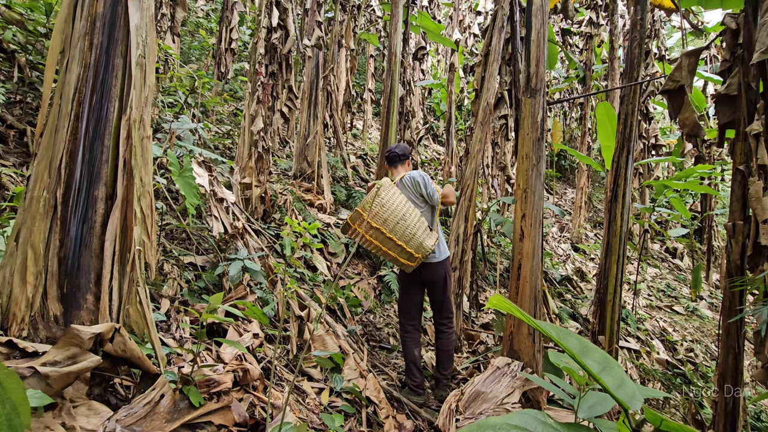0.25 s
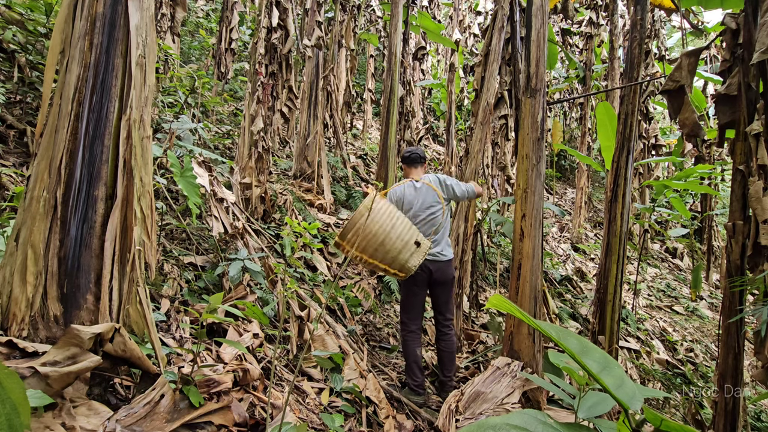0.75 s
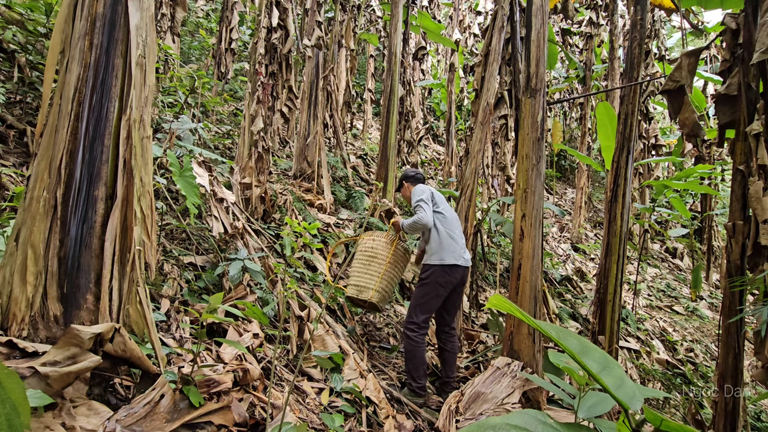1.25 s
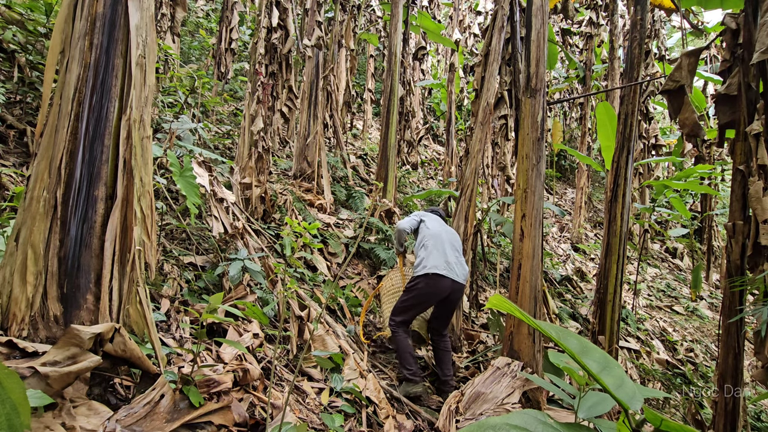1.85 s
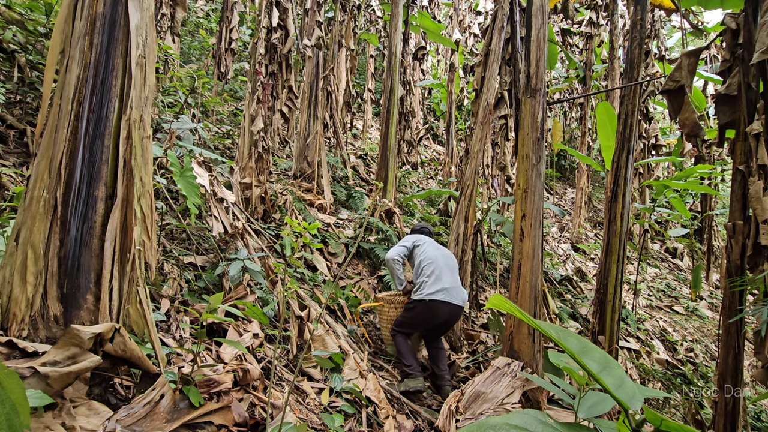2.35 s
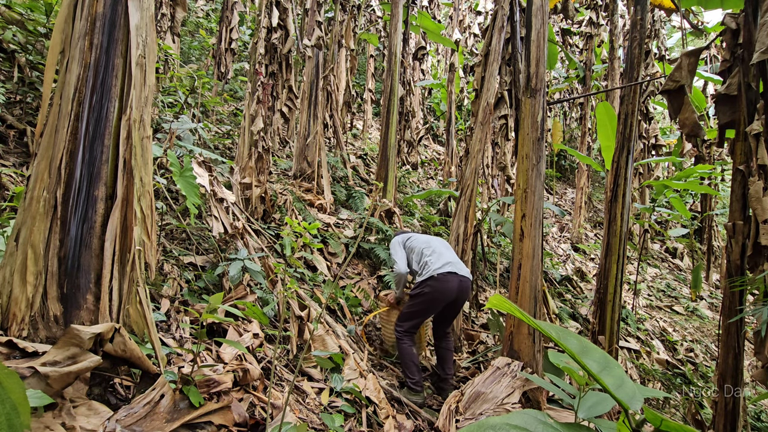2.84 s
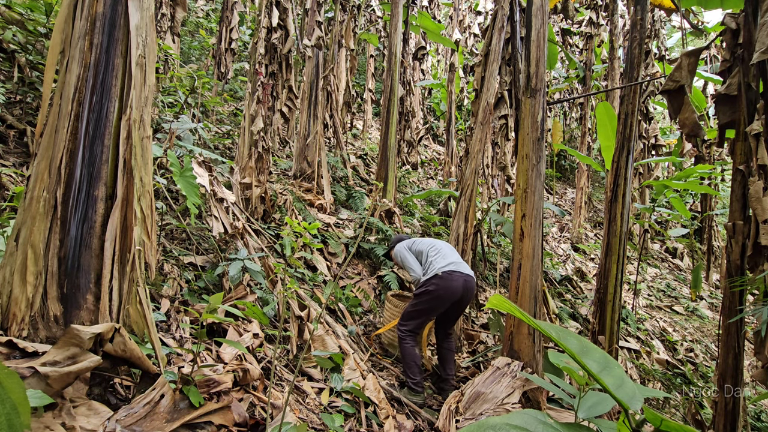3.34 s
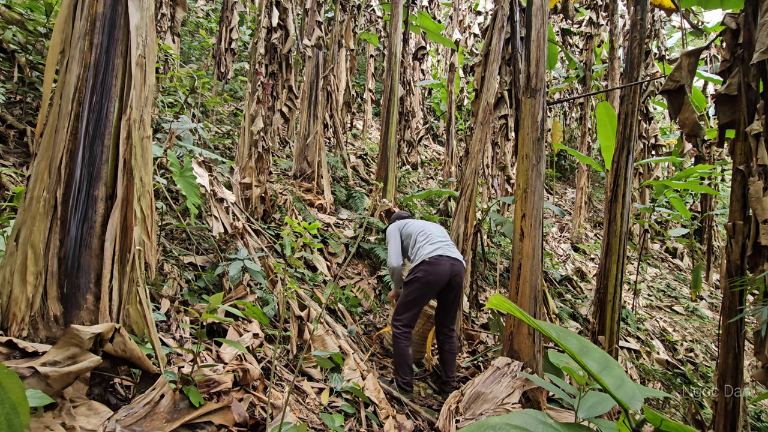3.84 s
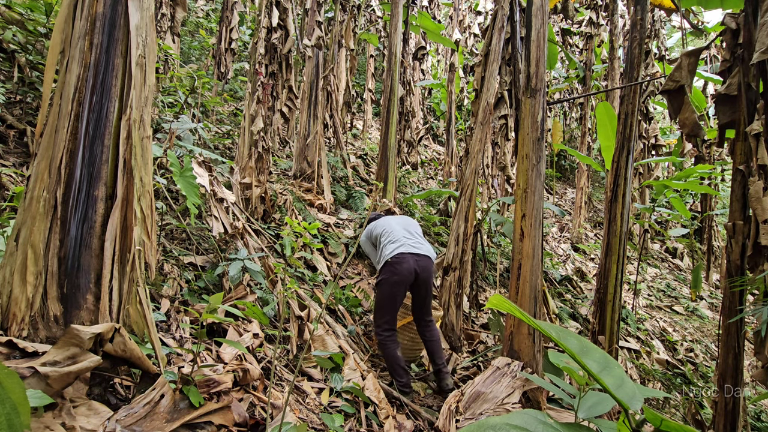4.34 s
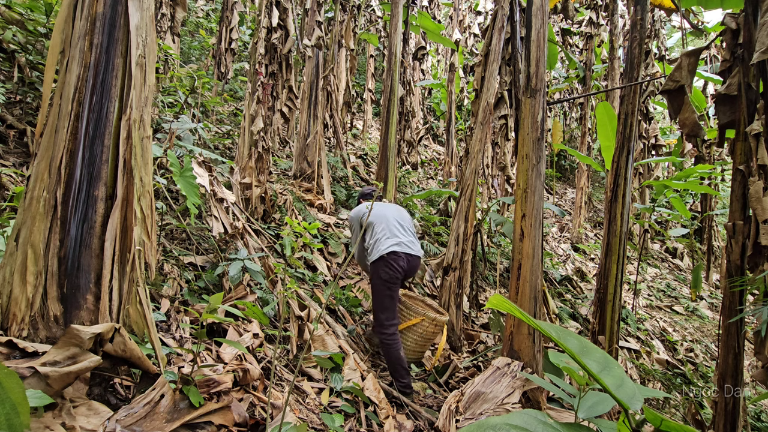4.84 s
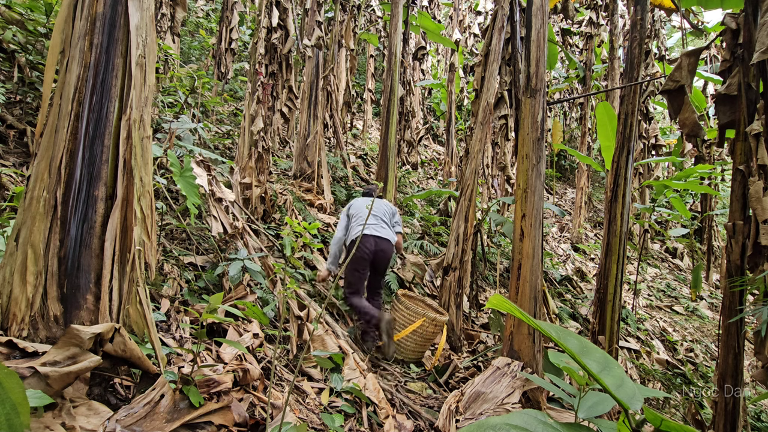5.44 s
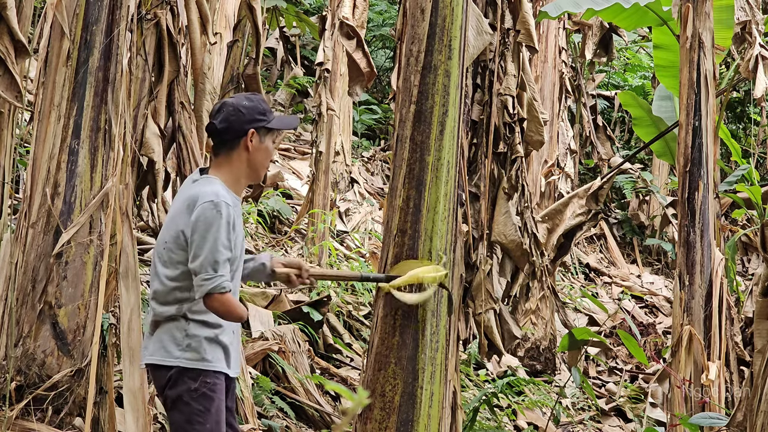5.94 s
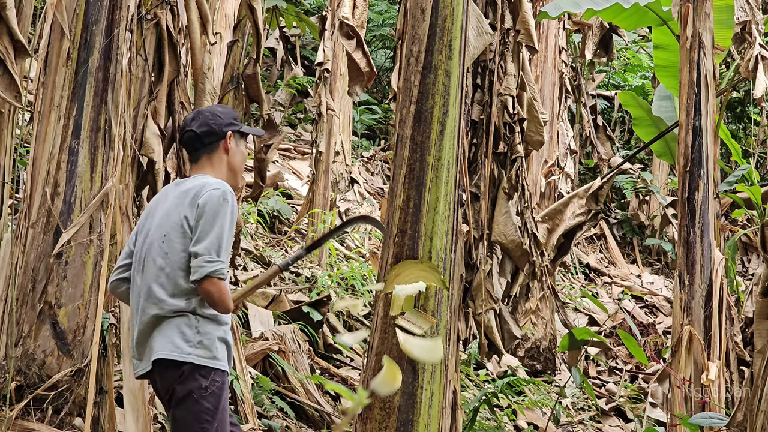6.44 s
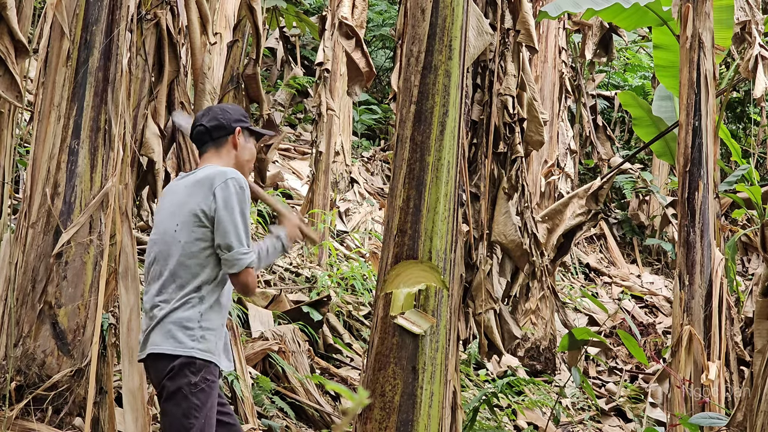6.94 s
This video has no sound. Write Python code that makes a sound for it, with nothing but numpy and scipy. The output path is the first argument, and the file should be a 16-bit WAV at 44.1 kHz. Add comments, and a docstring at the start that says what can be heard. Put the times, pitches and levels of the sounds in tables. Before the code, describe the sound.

A quiet grove with soft air and faint high insect hiss. A tiny bird chirp comes at about 0.1 s over light leaf movement. At 0.5 s a step crunches with sharp little snaps; sparse crackles follow, with a woody knock at 1.3 s. Wicker gives a short gliding squeak at 1.5 s, then soil thuds and a ringing scrape at 1.8 s. Another step thuds near 2.4 s. A very sharp, bright snap cracks at 3.06 s, followed by a low wicker creak. Leaves rustle in tugs from 3.8 to 4.9 s with many stalk snaps, swelling to dense bright crackling at 5.1-5.6 s and low thuds near 5.7 s. From 6.0 s a juicy stem tears with hollow, fibrous cracks, strongest around 6.2 s; the blade slides out at 6.35 s. Chips drop with knocks, soft thuds and leaf rustle until 7.1 s. Short scattered echo, stereo, handling slightly left.

```python
"""Cutting a stem in a banana grove

Someone steps over dry leaves, sets a wicker basket down and drags it: tiny noisy breaks crackle,
stalks and wicker snap in short bursts, soil thuds softly, and rubbed wicker squeaks, scrapes and creaks.
Later, and louder, a blade is levered in a juicy stem: fibres tear and chips drop on the litter.
Insects hiss as narrow noise, a small bird chirps once as a gliding tone, and trunks scatter a short echo."""
import sys
import numpy as np
from scipy import signal
from scipy.fft import rfft, irfft, next_fast_len
from scipy.io import wavfile
from scipy.ndimage import uniform_filter1d, map_coordinates

SR = 44100
rng = np.random.default_rng(int(sys.argv[2]) if len(sys.argv) > 2 else 0)


def unload_wav(signal):
    """Save mono or channel-first audio to the path in sys.argv[1] as 16-bit WAV at rate SR, clipped to [-1, 1]."""
    wavfile.write(
        sys.argv[1],
        SR,
        np.round(np.clip(np.atleast_2d(signal).T, -1, 1) * 32767).astype(np.int16),
    )


N = 316638  # length in samples

# each step, drag or tug in the litter: peak_s, swell_s, fade_s, crackle_db,
# then relative to the crackle: sheen_db, crunch_db, rumble_db
LITTER_STIRS = [(0.185, 0.37, 0.073, -67.5, -2, -12, 2), (0.531, 0.14, 0.14, -51.5, -1, -6, -12),
                (0.72, 0.14, 0.19, -62.5, -0.5, -15, -18), (0.95, 0.17, .22, -64.5, 2, -5, -3),
                (1.18, .02, 0.12, -64, -7, -20, -10), (1.325, 0.025, 0.089, -58.5, -4, 2, -7),
                (1.484, 0.013, 0.062, -54, 3, -30, -30), (1.64, 0.1, 0.39, -66.5, -2, -11, -19),
                (1.78, .025, 0.18, -63, -5, -2, 10.5), (1.916, 0.12, 0.085, -53, -1.5, 0.5, 0),
                (2.09, 0.11, 0.28, -60, -1.5, -8.5, -10), (2.24, 0.25, 0.15, -59.5, 0.5, -3.5, -9),
                (2.461, 0.082, 0.15, -52, -3.5, -4.5, 0.5), (2.794, 0.015, .16, -60.5, 5.5, -24, -8),
                (2.87, .03, 0.16, -59.5, -2, -20, -6), (2.993, .1, 0.44, -54, -2, -5, -20),
                (3.073, 0.033, 0.22, -50, -2, -3, -8), (3.26, 0.3, 0.16, -54.5, -1, -11.5, -7),
                (3.6, 0.26, 0.39, -67, -2, -9, -20), (3.79, 0.16, 0.16, -56, 0, -9, -22),
                (3.93, 0.19, 0.12, -52.5, -0.5, -5.5, -20), (4, 0.15, 0.22, -48, -0.5, 1, -13),
                (4.15, 0.16, 0.41, -55, 0, -1.5, -4), (4.415, 0.13, 0.25, -58.5, -1, -2.5, -20),
                (4.51, 0.24, 0.13, -57, 1.5, -7, -10), (4.63, 0.09, 0.1, -57, 1, -13, -15),
                (4.8, .06, .09, -75, -7, -23, -14), (4.93, 0.085, 0.35, -53, 1, -8.5, -21),
                (5.083, 0.11, 0.08, -45.5, 0, -7, -11), (5.172, 0.12, 0.16, -44, 0, -2, -6),
                (5.28, 0.11, 0.095, -46.5, 0.5, -4, -11), (5.37, 0.11, 0.079, -41, 2.5, -12, -7.5),
                (5.434, 0.058, .1, -46, 3, -6, -0.5), (5.541, 0.13, 0.17, -43.5, 0, -6.5, -6.5),
                (5.68, 0.082, 0.12, -48, -0.5, 0.5, 4), (5.88, 0.066, 0.094, -55, -2, 0.5, -3.5),
                (6.003, 0.045, 0.19, -57.5, -11, 5, -12), (6.082, 0.086, 0.39, -46, -4, 0, -12.5),
                (6.215, 0.1, 0.14, -44, 1, -1, -14), (6.4, 0.12, 0.25, -60, -8, -1, -33),
                (6.501, 0.24, 0.14, -52, -0.5, -1.5, -6), (6.635, 0.039, 0.37, -55, 0, -4.5, -7),
                (6.75, 0.18, 0.17, -53, -3, -5, -3), (6.849, 0.18, 0.19, -49, 1, -8, -20),
                (6.975, 0.086, .04, -60.5, -6, 6.5, 4), (7.061, 0.017, 0.27, -50.5, 0, -13, -7)]
# the litter between stirs: crackle_db, then relative to it: sheen_db, crunch_db, rumble_db
LITTER_REST = (-74.5, -1.5, 2.5, 3)
# how steeply stirs swell and fade, as a power for: crackle, sheen, crunch, rumble
RAMP_POWERS = (1.4, 1.5, 1.6, 2.4)
# colours of the four litter layers: pitch_hz, level_db
CRACKLE_COLOUR = [(900, -11), (1600, -8), (2600, -2.5), (4100, 0), (6500, -2.5), (8000, -4.5), (9500, -66)]
SHEEN_COLOUR = [(6000, -21), (8000, -8.5), (10000, -9.5), (11600, -5.5), (13500, -13), (15400, -11.5)]
CRUNCH_COLOUR = [(180, -44), (320, -2.5), (700, -1), (1300, -3), (2200, -5), (3500, -24)]
RUMBLE_COLOUR = [(20, -45), (45, -36), (75, 3), (110, -4.5), (220, -1), (330, -10.5), (500, -19)]
# colour of the steady air: pitch_hz, level_db
AIR_COLOUR = [(18, -8), (30, 4), (86, 3.5), (149, -4.5), (279, 3), (372, -17), (680, -10), (1090, -19),
              (1340, -20), (1890, -46), (2520, -11), (4150, -6), (5680, -14), (7390, -13), (15800, -68)]
# how alike left and right are: pitch_hz, likeness (1 same, 0 unrelated)
LEFT_RIGHT_LIKENESS = [(60, .98), (250, .94), (640, .8), (1400, .62), (3100, .2), (7000, .05), (15000, -.1)]
# band of the insect hiss: pitch_hz, width_hz, level_db
INSECT_BAND = [(6400, 400, 0)]
# path of the bird's chirp: time_s, pitch_hz, level_db
BIRD_CHIRP = [(0.025, 6870, -82), (0.057, 6957, -64), (0.115, 6500, -75)]
# snaps of stalks, wicker and fibre: start_s, level_db,
# then relative to that level: knock_db, sheen_db; last the piece's own pitch_hz
SNAP_EVENTS = [(0.125, -59, -4.5, -1, 4120), (0.164, -52.5, -12, -5, 4370), (0.2015, -58.5, -6, -2, 3740),
               (0.5033, -44, -19, -1, 3230), (0.5345, -45, -6, 1, 3900), (0.5509, -43, -5, -15, 3950),
               (0.705, -49, -9.5, 5.5, 2080), (0.7394, -50.5, -26, -4, 3660), (0.8035, -52, -16, -13, 4700),
               (0.8163, -52.5, -1.5, 8, 1590), (1.004, -55, -24, -6, 2750), (1.1741, -45, -34, -19, 3100),
               (1.2754, -52.5, -12, 9, 4570), (1.3194, -40, 7.5, -27, 1180), (1.401, -64, -6, -18, 1190),
               (1.4731, -56, -29, 9, 1280), (1.6316, -39.5, -8, 0, 4500), (1.75, -47, -12.5, -3, 2300),
               (1.8842, -43, -19, -2, 2540), (2.4024, -52, -4, -14, 2000), (2.4389, -51, 2, -1, 1990),
               (2.7926, -63, -18, 19, 2030), (2.8585, -51.5, -14, 5, 5430), (3.0628, -24.5, -28, 9.5, 1580),
               (3.468, -58.5, -20, 3, 5500), (3.5448, -58, -23, 0, 4220), (3.5905, -58, -8, 11, 3680),
               (3.6787, -54.5, -6, 5.5, 3700), (3.7696, -47, -5, 4.5, 1920), (3.8736, -45, -24, -20, 4230),
               (3.9987, -38, 1, -10, 1940), (4.1583, -43, -23, -7, 3580), (4.2885, -49.5, -18, -16, 3740),
               (4.3578, -42.5, -17, -4, 2270), (4.4068, -38.5, -1, 6, 5700),
               (4.458, -38.5, -1.5, -14, 1730), (4.5506, -39.5, -32, -3, 2280), (4.57, -43.5, -10, 4, 4700),
               (4.6252, -46.5, -14.5, 6.5, 3340), (4.7826, -55, -33, 8.5, 3380),
               (4.7972, -52, -36, -9, 4210), (4.8432, -56, -22, 10.5, 4240), (4.9058, -52, -11, 8, 4520),
               (4.9811, -44.5, -3, -16, 1020), (5.1028, -33.5, -32, -2, 6060),
               (5.4301, -36.5, -24, -8, 3740), (5.514, -39, -1, -15, 1950), (5.6524, -41.5, 6, -5, 1330),
               (5.8682, -46.5, -12, -16, 1270), (5.9944, -53, 12, -26, 1330),
               (6.0629, -40.5, -2, -23, 1710), (6.186, -33, -3.5, -20, 1090), (6.2395, -34.5, -4, -5, 1090),
               (6.3287, -49.5, 5, -22, 2220), (6.3556, -46.5, 0, -14, 2500), (6.4869, -46.5, 7, -16, 1610),
               (6.622, -47, -24, 0, 2400), (6.718, -40.5, -9, -17, 1000), (6.756, -40.5, -3, -16, 2170),
               (6.8858, -43.5, 0, -23, 2590), (7.0569, -41, -6.5, -3, 3460)]
# soft blows on the soil: start_s, level_db, pitch_hz
SOIL_THUDS = [(0.539, -49, 299), (1.321, -47, 254), (1.767, -39.5, 108), (1.798, -45.5, 205),
              (1.836, -46, 260), (1.855, -41, 199), (2.432, -40.5, 250), (2.451, -45, 69.6),
              (2.468, -48, 133), (3.999, -43, 104), (4.46, -38.5, 218), (5.307, -41.5, 200),
              (5.458, -43, 238), (5.655, -35.5, 155), (5.674, -33, 122), (5.708, -34, 85),
              (6.484, -41.5, 220), (6.509, -46, 233), (6.701, -45, 229), (6.748, -40, 192),
              (6.88, -46, 230), (6.962, -47.5, 237), (7.058, -44.5, 130)]
# a squeaking wicker strand: time_s, pitch_hz, level_db
WICKER_SQUEAK = [(1.482, 1097, -74), (1.49, 1165, -50.5), (1.497, 1254, -47.5), (1.504, 1334, -53),
                 (1.512, 1350, -83), (1.53, 1300, -60), (1.545, 1210, -64)]
# the basket scraping over the litter: time_s, level_db
SCRAPE_STROKE = [(1.765, -57), (1.785, -52), (1.82, -54), (1.855, -52), (1.885, -60)]
# its ringing wicker: pitch_hz, width_hz, level_db
SCRAPE_RING = [(2100, 72, 7.5), (2700, 80, -1), (3440, 200, -1.5), (4900, 110, -7), (6450, 250, -19),
               (7300, 193, -10)]
# the wicker creaking as it settles: time_s, level_db
CREAK_STROKE = [(3.175, -57), (3.25, -57), (3.315, -64)]
# its hollow: pitch_hz, width_hz, level_db
CREAK_HOLLOW = [(402, 66, 1), (780, 29, -1)]
# the levered stem tearing: time_s, level_db
TEAR_STROKE = [(6.03, -53), (6.04, -63), (6.146, -43), (6.258, -58), (6.27, -68)]
# its hollow: pitch_hz, width_hz, level_db
STEM_HOLLOW = [(536, 42, 0.5), (718, 42, -1.5), (1000, 44, -3)]
# the blade sliding out along the cut: time_s, level_db
SLIDE_STROKE = [(6.324, -50), (6.34, -46), (6.37, -47), (6.39, -56), (6.415, -59)]
# its colour: pitch_hz, width_hz, level_db
BLADE_COLOUR = [(1310, 1500, -5.5), (2480, 620, -1), (3130, 400, -3.5)]
# time the echo takes to drop 60 dB: pitch_hz, t60_s
ECHO_T60 = [(200, 0.13), (2000, 0.13), (12000, 0.16)]
# steep top end of the sound: pitch_hz, level_db
TOP_END = [(15600, 0), (15800, -25), (16000, -50)]

TOP_HZ = 16600  # nothing is kept from here up
AIR_DB, INSECTS_DB, ECHO_DB = -72.5, -79, -5.0
SETTLE_DB, SETTLE_T60_S = -12, 1  # faint settling after a stir, relative to that stir
SNAP_T60_S, KNOCK_T60_S, SHEEN_T60_S, THUD_T60_S = 0.026, 0.052, 0.025, 0.077
CRACK, CRACK_AT_S, CRACK_WIDTH_S = 1.56, 0.0016, 0.0011  # spike on a snap: extra gain, time, width


def amp(db):
    """Turn a level in dB into a gain."""
    return 10 ** (np.asarray(db) / 20)


def unit(x):
    """Scale a signal to an average strength (rms) of 1."""
    return x / np.sqrt(np.mean(x ** 2) + 1e-20)


def along(points, hz):
    """Read a value between (pitch, value) points, spacing pitch as a log scale."""
    pitches, values = np.transpose(points)
    return np.interp(np.log(hz + 1), np.log(pitches + 1), values)


def curves(rows):
    """Draw each column after the time as a curve with one value per sample."""
    times, *columns = np.transpose(rows)
    return [np.interp(np.arange(N) / SR, times, column) for column in columns]


def stroke(rows):
    """Gain that follows the last column in dB and is silent outside the rows."""
    times, t = np.transpose(rows)[0], np.arange(N) / SR
    to_edge = np.minimum(t - times[0], times[-1] - t)
    return np.clip(to_edge / 0.008, 0, 1) * amp(curves(rows)[-1])


def wobble(rate):
    """A smooth random curve through `rate` random points a second."""
    points = rng.standard_normal(int(N * rate / SR) + 4)
    return map_coordinates(points, [np.arange(N) * rate / SR])


def filtered(x, response):
    """Shape a sound by a gain that depends on frequency."""
    n = x.shape[-1]
    padded = next_fast_len(n + 8192)
    spectrum = rfft(x, padded) * response(np.fft.rfftfreq(padded, 1 / SR))
    return irfft(spectrum, padded)[..., :n]


def modes(table):
    """Frequency response of a few resonances, with alternating signs."""
    def response(f):
        total = 0
        for k, (centre, width, db) in enumerate(table):
            peak = 1j * f * width / (centre ** 2 - f ** 2 + 1j * f * width)
            total = total + (-1) ** k * amp(db) * peak
        return total
    return response


def spread(pair, colour):
    """Colour two unrelated signals as left and right: alike in the bass, about unrelated in the treble."""
    def response(hz):
        angle = np.arccos(np.clip(along(LEFT_RIGHT_LIKENESS, hz), -1, 1)) / 2
        return amp(along(colour, hz)) * [np.cos(angle), np.sin(angle)]
    mid, side = filtered(pair, response)
    return unit(np.array([mid + side, mid - side]))


def noise_pair(n=N):
    """Two unrelated white noises."""
    return rng.standard_normal((2, n))


def grit(per_s, scatter_db, life_s):
    """Envelope of many tiny breaks: sudden starts of scattered strength, each dying away fast."""
    chance, luck = rng.random((2, N))
    starts = (chance < per_s / SR) * amp(-scatter_db * np.log(luck + 0.04))
    return unit(signal.lfilter([1], [1, -np.exp(-1 / (life_s * SR))], starts))


def patchy(patchy_db):
    """Two noises whose colour shifts in small patches, as different leaves take over."""
    z = signal.stft(noise_pair(), nperseg=512)[2]
    field = rng.standard_normal(z.shape[1:])
    for axis in (0, 1):
        field = uniform_filter1d(field, size=3, axis=axis)
    return signal.istft(z * amp(patchy_db * unit(field)), nperseg=512)[1][:, :N]


def stirred(layer):
    """Gain of a litter layer (0 crackle, 1 sheen, 2 crunch, 3 rumble): powers of rest and stirs add."""
    t = np.arange(0, N + 64, 64) / SR  # one point per 64 samples is enough
    power = amp(LITTER_REST[0] + [0, *LITTER_REST[1:]][layer]) ** 2
    for s, swell, fade, db, *relative in LITTER_STIRS:
        distance = np.where(t < s, (s - t) / swell, (t - s) / fade)
        ramp = np.clip(1 - distance, 0, 1) ** RAMP_POWERS[layer]
        # the rumble alone has no settling
        settle = (t > s) * (layer < 3) * amp(SETTLE_DB - 60 * abs(t - s) / SETTLE_T60_S)
        power = power + amp(db + [0, *relative][layer]) ** 2 * (ramp ** 2 + settle ** 2)
    return np.interp(np.arange(N) / SR, t, np.sqrt(power))


def leaves():
    """Dry leaves: dense breaks ride on a smoother swish, and part of them reaches both treble layers."""
    shared = grit(350, scatter_db=5.5, life_s=0.0046)
    surge_db = 1.64 * wobble(25)
    breaks = 1.53 + 0.28 * shared + 0.26 * grit(280, scatter_db=6.5, life_s=0.001)
    crackle = spread(breaks * patchy(3.2), CRACKLE_COLOUR) * stirred(layer=0)
    crackle = crackle * amp(surge_db + 1.07 * wobble(19))
    sheen = spread((0.88 + 0.43 * shared) * patchy(1.9), SHEEN_COLOUR) * stirred(layer=1)
    sheen = sheen * amp(surge_db)
    return crackle * amp([[0.85], [-0.85]]) + sheen * amp([[0.6], [-0.6]])  # a little left


def weight():
    """Weight on the litter: coarser, longer breaks, and a lumpy rumble through the soil."""
    breaks = 0.63 + 0.67 * grit(120, scatter_db=-0.5, life_s=0.02)
    crunch = spread(breaks * patchy(3.04), CRUNCH_COLOUR) * stirred(layer=2)
    lumps = amp(4.4 * wobble(22))
    rumble = spread(lumps * noise_pair(), RUMBLE_COLOUR) * stirred(layer=3)
    return crunch * amp([[0.7], [-0.7]]) + rumble


def steady_air():
    """Coloured noise that drifts gently in level."""
    return amp(AIR_DB + 1.1 * wobble(3.22)) * spread(noise_pair(), AIR_COLOUR)


def insects():
    """A faint hiss: narrow noise, unrelated left and right, wavering in level."""
    hiss = filtered(noise_pair(), lambda f: modes(INSECT_BAND)(f) ** 2)
    return amp(INSECTS_DB + 3.2 * wobble(6.7)) * unit(hiss)


def bird():
    """One thin chirp: a tone that rises a touch, then falls, blurred by fast pitch wobble."""
    hz = curves(BIRD_CHIRP)[0] + 150 * wobble(520)
    return np.sqrt(2) * stroke(BIRD_CHIRP) * np.sin(2 * np.pi * np.cumsum(hz) / SR)


def snaps():
    """A sharp crack and short tail in three colours, the middle one favouring the piece's own pitch."""
    out, t = np.zeros((2, N + SR)), np.arange(SR // 5) / SR
    spike = 1 + CRACK * np.exp(-((t - CRACK_AT_S) / CRACK_WIDTH_S) ** 2)
    attack = 1 - np.exp(-t / 0.002)
    for s, db, knock_db, sheen_db, hz in SNAP_EVENTS:
        own = unit(filtered(rng.standard_normal(len(t)), modes([(hz, hz / 5, 0)])))
        middle = spread(noise_pair(len(t)), CRACKLE_COLOUR) + 0.65 * own
        knock = spread(noise_pair(len(t)), CRUNCH_COLOUR)
        sheen = spread(noise_pair(len(t)), SHEEN_COLOUR)
        burst = amp(-60 * t / SNAP_T60_S) * middle
        burst = burst + amp(knock_db - 60 * t / KNOCK_T60_S) * knock
        burst = burst + amp(sheen_db - 60 * t / SHEEN_T60_S) * sheen
        start = round(s * SR)
        out[:, start:start + len(t)] += amp(db) * attack * spike * burst
    return out[:, :N]


def thuds():
    """Each blow is a short low puff around the pitch of the patch of soil it lands on."""
    out, t = np.zeros(N + SR), np.arange(SR // 4) / SR
    for s, db, hz in SOIL_THUDS:
        fade = amp(db - 60 * t / THUD_T60_S) * (1 - np.exp(-t / 0.005))
        soil = modes([(hz, hz * 0.9, 0)])
        puff = unit(filtered(rng.standard_normal(len(t)), lambda f: soil(f) ** 2))
        start = round(s * SR)
        out[start:start + len(t)] += fade * puff
    return out[:N]


def squeak():
    """A strand slips in a fast, unsteady rhythm: a rough gliding tone whose octave fades first."""
    hz = curves(WICKER_SQUEAK)[0] * (1 + 0.068 * wobble(540))
    phase = 2 * np.pi * np.cumsum(hz) / SR
    push = stroke(WICKER_SQUEAK)
    octave = 1.13 * push / push.max() * np.sin(2 * phase)
    return amp(2.1 * wobble(245.5)) * push * (np.sin(phase) + octave)


def rubbing(rows, table, per_s, scatter_db):
    """Rubbing sticks and slips: the tiny slips excite fixed resonances under a stroke."""
    slips = (0.99 + grit(per_s, scatter_db, life_s=0.00032)) * rng.standard_normal(N)
    return stroke(rows) * unit(filtered(slips, modes(table)))


def basket_scrape():
    """Dense slips on the litter make the basket's wicker ring."""
    return rubbing(SCRAPE_STROKE, SCRAPE_RING, per_s=430, scatter_db=3)


def wicker_creak():
    """Sparse slips in settling wicker excite its low hollow."""
    return rubbing(CREAK_STROKE, CREAK_HOLLOW, per_s=56, scatter_db=3.8)


def stem_tear():
    """Fibres slip apart and excite the stem's hollow."""
    return rubbing(TEAR_STROKE, STEM_HOLLOW, per_s=197, scatter_db=2.2)


def blade_slide():
    """The blade slips along the cut with a brighter, broader colour."""
    return rubbing(SLIDE_STROKE, BLADE_COLOUR, per_s=380, scatter_db=4.7)


def grove(x):
    """Trunks and hanging leaves scatter a short tail, lasting slightly longer in the top treble."""
    hz, _, z = signal.stft(noise_pair(SR // 2), SR, nperseg=256)
    t = np.arange(z.shape[-1]) * 128 / SR  # the analysis moves on by 128 samples a frame
    fade = amp(-60 * t / along(ECHO_T60, hz)[:, None])
    tail = signal.istft(z * fade, SR, nperseg=256)[1]
    return signal.fftconvolve(x, tail / np.linalg.norm(tail[0]), axes=1)[:, :N]


def scene():
    """Handled things and the bird, a little to the left, with echo; then soil, litter, air and insects."""
    wicker = squeak() + basket_scrape() + wicker_creak()
    stem = stem_tear() + blade_slide()
    echoing = (bird() + snaps() + wicker + stem) * amp([[0.8], [-0.8]])
    background = leaves() + weight() + steady_air() + insects()
    return echoing + amp(ECHO_DB) * grove(echoing) + thuds() + background


def record(dry):
    """The sound falls off steeply near 16 kHz and stops at TOP_HZ."""
    return filtered(dry, lambda hz: amp(along(TOP_END, hz)) * (hz < TOP_HZ))


dry = scene()
out = record(dry)
unload_wav(out)
```